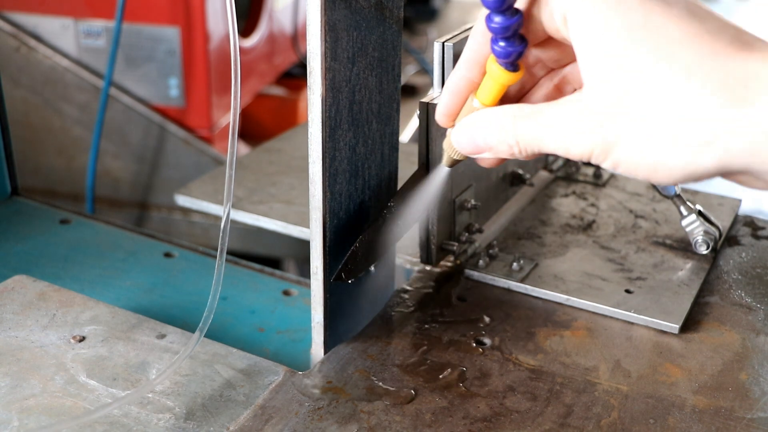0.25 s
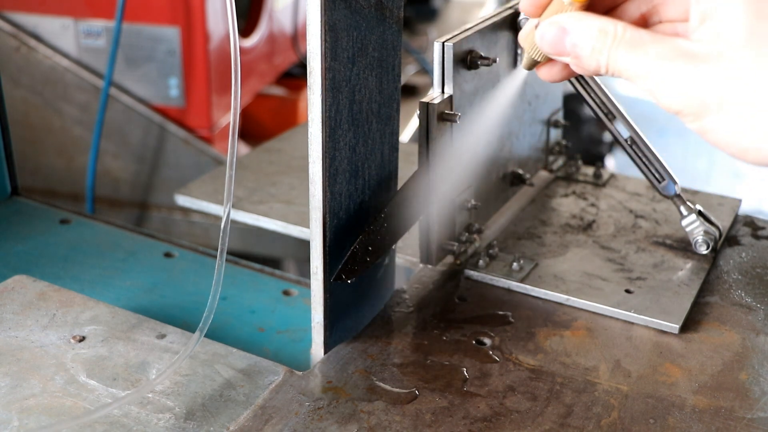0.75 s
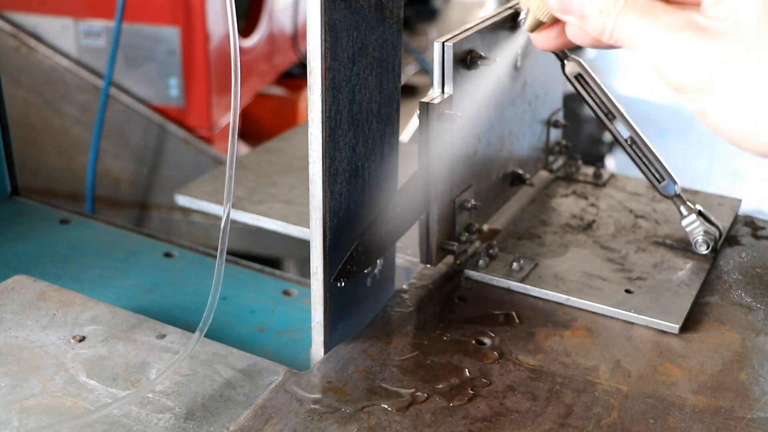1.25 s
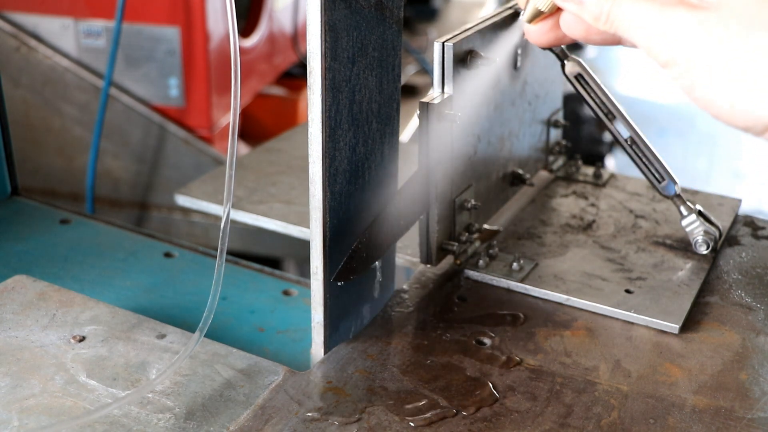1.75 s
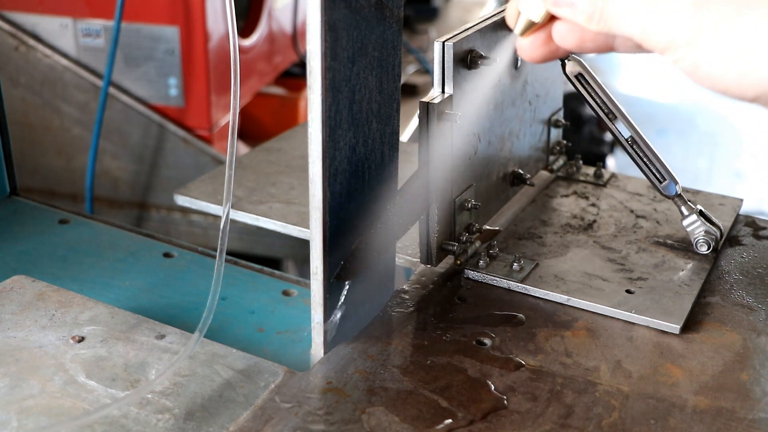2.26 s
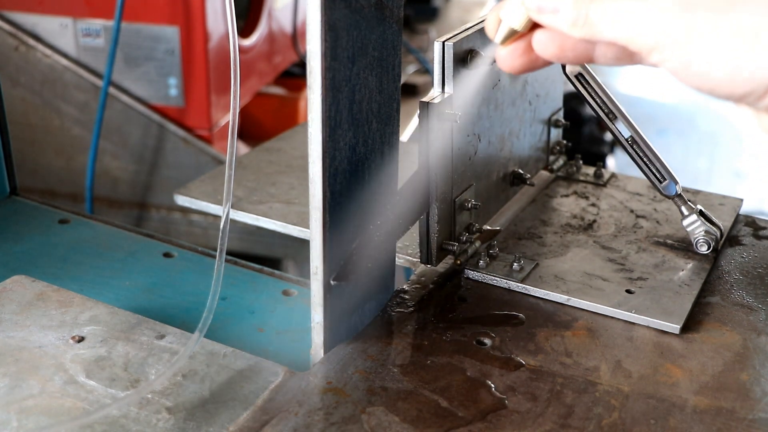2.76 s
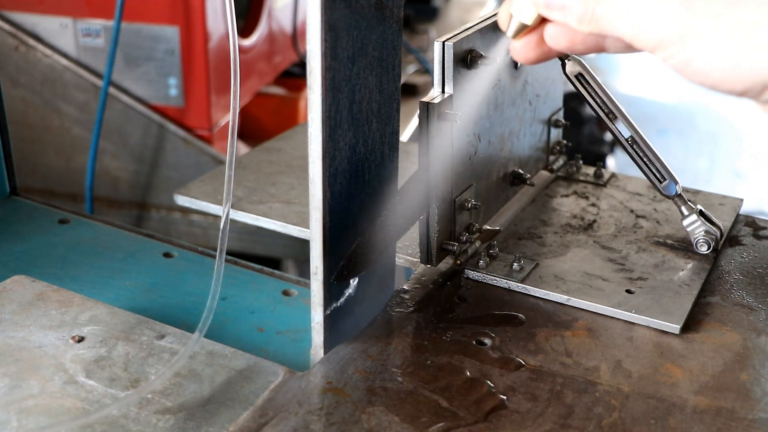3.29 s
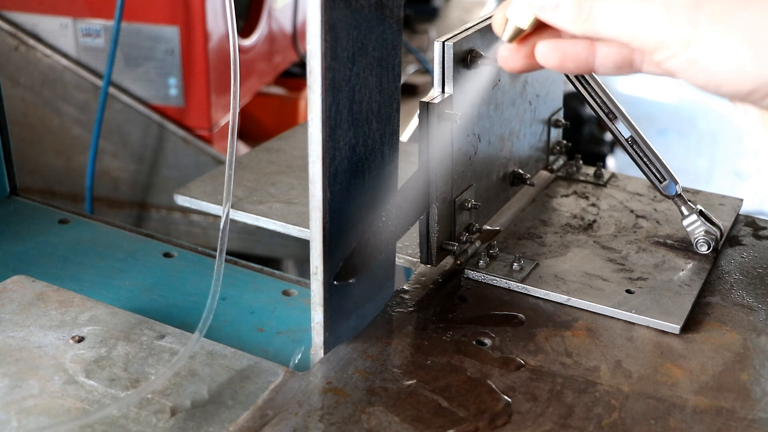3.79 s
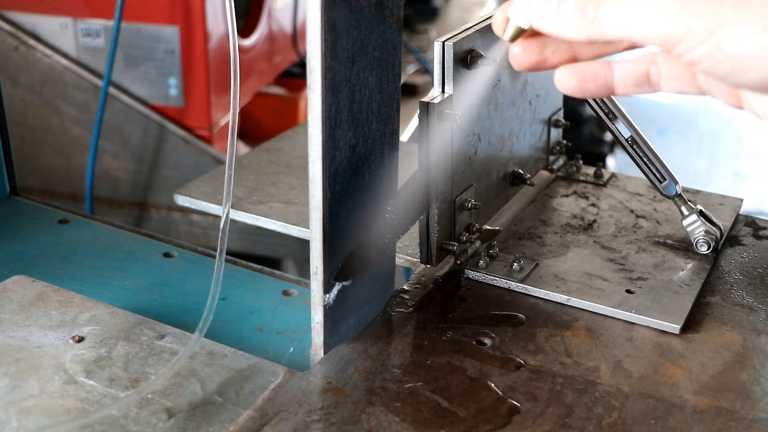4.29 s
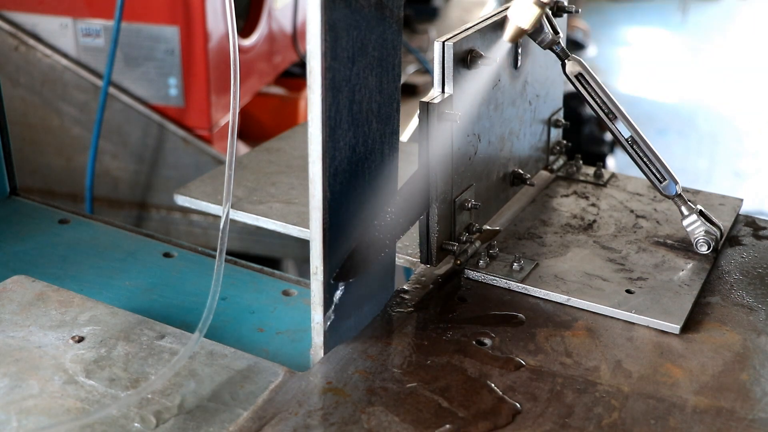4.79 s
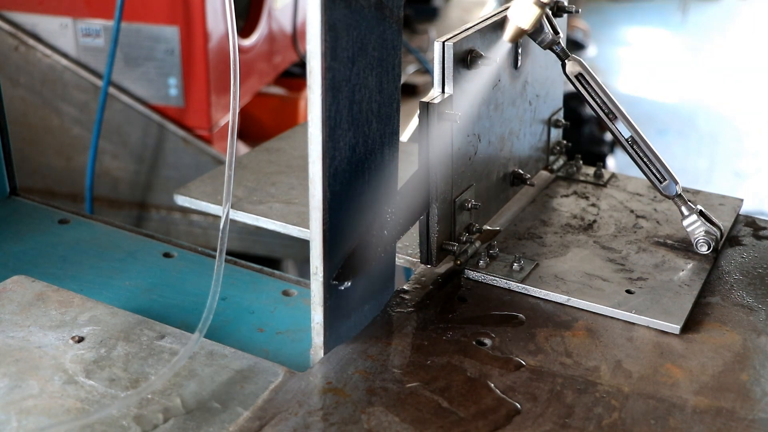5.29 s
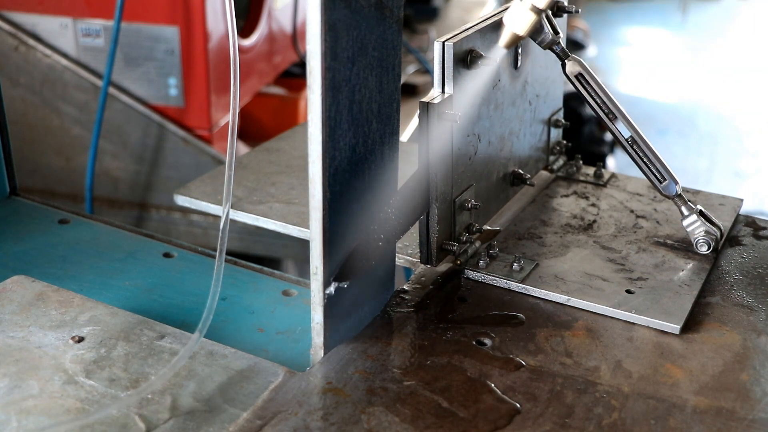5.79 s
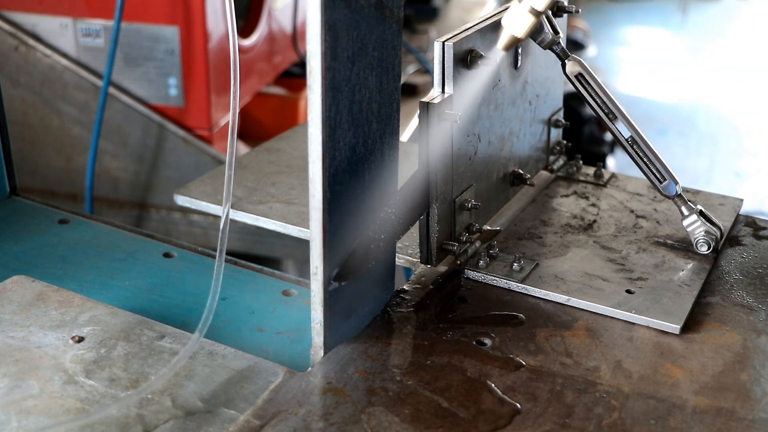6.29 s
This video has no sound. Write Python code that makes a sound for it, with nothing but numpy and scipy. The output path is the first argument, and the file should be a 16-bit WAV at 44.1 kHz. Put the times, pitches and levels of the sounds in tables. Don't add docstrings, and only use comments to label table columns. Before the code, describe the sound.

A compressed-air nozzle blows fine mist on a steel blade throughout, close to a stereo microphone in a workshop with short, bright reflections. From 0 to about 1.2 seconds the jet is near: dense sizzling hiss, a coarse midrange roar and irregular buffeting slaps, strongest at the start and around 0.3 to 0.6, with a bright flick near 0.9 followed by a duller push. As the nozzle rises, the hiss takes on a sliding, hollow, phasing color. From 1.2 to 4.1 it is steadier and smoother, slightly stronger near 1.7, softer around 2.15, with a tiny tick at 2.6, leaning a little right. Around 4.4 the hand leaves and the hiss briefly dips and changes color. It then steadies, with somewhat firmer roar and buffeting, a clearer low hum, and light slaps near 5.8 and 6.5, still blowing at the end.

```python
import sys
import numpy as np
from scipy import signal
from scipy.io import wavfile
from scipy.ndimage import uniform_filter1d

SR = 44100
rng = np.random.default_rng(int(sys.argv[2]) if len(sys.argv) > 2 else 0)


def undo_db(level):
    steps = np.asarray(level, float) / 20
    return 10 ** steps


def generate_wav(signal):
    frames = np.transpose(np.atleast_2d(signal))
    scaled = np.clip(frames, -1, 1) * 32767
    pcm = np.round(scaled).astype(np.int16)
    wavfile.write(sys.argv[1], SR, pcm)


N = 288803
HOP, SIZE, LOW_SIZE = 128, 512, 2048
TIME = np.arange(N // HOP + 6) * HOP / SR
HZ = np.fft.rfftfreq(SIZE, 1 / SR)[:, None]
LOW_HZ = np.fft.rfftfreq(LOW_SIZE, 1 / SR)[:, None]

# (time [s], nozzle hiss [dB], left-right [dB], force on the blade [dB])
JET = [(0.0, -23.5, -1.5, -34), (0.4, -23.5, -2.5, -34.5), (0.7, -23, -3, -37), (1.2, -23, -3, -41.5),
       (1.65, -22, -3, -42.5), (2.15, -25, -5.0, -42.5), (2.65, -23.5, -3.5, -40.5), (3.35, -24, -4, -40.5),
       (3.65, -24, -4, -41), (4.12, -22.5, -3.5, -41), (4.38, -26.5, -3.5, -40.5), (4.58, -24.5, -3, -38.5),
       (4.9, -23.5, -2.5, -38), (5.35, -23.2, -2.9, -37.5), (5.65, -23, -1.9, -38), (6.55, -24, -2.5, -37)]
# (time [s], detour by the bench [ms], detour by the plate [ms], turn to the post [0-1])
POSE = [(0.0, .376, .73, 0), (.3, .377, .697, 0), (.5, .436, .766, -.1), (.6, .515, .8, 0),
        (.7, .549, .872, 0), (.95, .581, .965, .15), (1.2, .644, .99, 0), (1.55, .645, 1.042, .12),
        (1.9, .634, 1.02, .3), (2.15, .619, .88, 0), (2.5, .599, .876, .2), (2.9, .593, .874, .4),
        (3.3, .582, .869, .4), (3.7, .578, .862, .85), (4.15, .577, .9, 1), (4.6, .582, .875, .35),
        (5.4, .581, .87, .35), (6.0, .584, .738, .35)]
BENCH_REST_MS, PLATE_REST_MS = .585, .88
EASY_DB = -40.5
BUFFET_DB = -50
LET_GO_S = 4.4


def evened(x):
    return x / np.sqrt(np.mean(abs(x) ** 2) + 1e-20)


def read(points, hz):
    f, value = np.transpose(points)
    return np.interp(np.log(hz + 1), np.log(f + 1), value)


def columns(rows, t):
    s, *values = np.transpose(rows)
    return [np.interp(t, s, v) for v in values]


def smoothed(x, length, axis=-1):
    return uniform_filter1d(uniform_filter1d(x, length, axis=axis), length, axis=axis)


def drift(frames):
    return evened(smoothed(rng.standard_normal(len(TIME)), frames))


def unsteady(frames, bins):
    field = rng.standard_normal((len(TIME), len(HZ))).T
    return evened(smoothed(smoothed(field, bins, axis=0), frames, axis=1))


def eddies(bins, frames):
    a, b = rng.standard_normal((frames, bins, 2)).T
    return a + 1j * b


def sound(z, size):
    return signal.istft(z, nperseg=size, noverlap=size * 3 // 4)[1][..., :N]


def pair(colour):
    # (frequency [Hz], likeness [0-1])
    likeness = [(30, 1), (230, .9995), (310, .965), (640, .88), (1400, .7)]
    frames = N * 4 // LOW_SIZE + 6
    same = np.clip(read(likeness, LOW_HZ), -1, 1)
    left = eddies(len(LOW_HZ), frames)
    right = same * left + np.sqrt(1 - same ** 2) * eddies(len(LOW_HZ), frames)
    return evened(sound(np.array([left, right]) * colour, LOW_SIZE))


def rumble():
    # (frequency [Hz], density [dB])
    hum = [(13, -52), (22, -17), (108, -9.5), (171, -1.5), (200, -3), (220, -7), (290, -57), (480, -120)]
    t = np.arange(N) / SR
    open_db = 2.5 * np.clip((t - LET_GO_S) / .3, 0, 1)
    force_db = columns(JET, t)[2] - EASY_DB
    level_db = -62 + open_db + 0.6 * force_db
    return pair(undo_db(read(hum, LOW_HZ))) * undo_db(level_db)


def shop(x):
    # (frequency [Hz], t60 [s])
    decay = [(300, 0.057), (2000, 0.46), (8000, 0.27), (16000, 0.025)]
    start_s, spacing = .0012, 20
    slots = np.arange(0, SR // 2 - spacing, spacing)
    at = slots + rng.integers(0, spacing, (2, len(slots)))
    taps = np.zeros((2, SR // 2))
    np.put_along_axis(taps, at, rng.choice([-1., 1.], at.shape), axis=1)
    hz, t, z = signal.stft(taps, SR, nperseg=256)
    tail = signal.istft(z * undo_db(-60 * t / read(decay, hz)[:, None]), SR, nperseg=256)[1]
    tail = np.pad(tail, ((0, 0), (round(start_s * SR), 0)))
    return signal.fftconvolve(x[None], tail / np.linalg.norm(tail[0]), axes=1)[:, :N]


def slapped(t):
    # (start [s], hold [s], level above the buffeting [dB], brightness [dB])
    slaps = [
        (0.0, 0.17, 5, 3),
        (0.154, .025, 1, 4),
        (.325, 0.082, 5.5, 6),
        (0.454, 0.027, 4, -8),
        (.55, 0.098, 2, 0),
        (.855, 0.027, 3.5, 9),
        (0.928, .25, 5, -21),
        (2.598, 0.0091, 2, -1),
        (5.83, 0.036, 3.5, 3),
        (6.5, .05, 1.5, 1),
    ]
    rise_s, fall_s = 0.011, .06
    force_db = columns(JET, t)[2] - EASY_DB
    level_db = BUFFET_DB + 1.5 * force_db
    upper_db = -7 + 1.26 * force_db
    for start, hold, lift_db, bright_db in slaps:
        rise = 1 + (t - start) / rise_s
        fall = 1 + (start + hold - t) / fall_s
        shape = np.clip(np.minimum(rise, fall), 0, 1)
        level_db = level_db + lift_db * shape
        upper_db = upper_db + bright_db * shape
    return level_db, upper_db


def buffeting():
    # (frequency [Hz], density [dB])
    thump = [(88, -45), (150, -17.5), (247, -3.5), (306, -5.5), (438, -3.5), (565, -8), (770, -10.5),
             (840, -11.5), (1000, -14), (1300, -10), (2200, -120)]
    # (frequency [Hz], width [Hz], lift [dB])
    room_modes = [(261, 26, 7), (360, 35, 3), (443, 32, 6), (500, 20, 4), (659, 24, 7), (850, 60, 4)]
    trim_db, bright, right_db, body_per_db = .3, .8, .4, 0.14
    lift_db = sum(db / (1 + (2 * (LOW_HZ - mode_hz) / width) ** 2) for mode_hz, width, db in room_modes)
    level_db, upper_db = slapped(np.arange(N) / SR)
    slap = pair(undo_db(read(thump, LOW_HZ) + lift_db))
    low = signal.sosfiltfilt(signal.butter(3, 770, fs=SR, output="sos"), slap)
    body = signal.sosfiltfilt(signal.butter(2, (330, 540), "bandpass", fs=SR, output="sos"), slap)
    upper = (slap - low) * undo_db(bright * upper_db)
    gathered = body * (undo_db(body_per_db * (level_db - BUFFET_DB)) - 1)
    return (low + upper + gathered) * undo_db(level_db + trim_db) * undo_db([[-right_db], [right_db]])


def echo(rule):
    bench_ms, plate_ms, turn = columns(POSE, TIME)
    lift, swing = bench_ms - BENCH_REST_MS, plate_ms - PLATE_REST_MS
    path = []
    for ms, per_lift, per_swing, strength, swing_gain, turn_gain in rule:
        path.append(ms + per_lift * lift + per_swing * swing)
        path.append(np.maximum(strength + swing_gain * swing + turn_gain * turn, 0))
    return path


def unsettled(path):
    pass_s, pass_half_s, blocked = 4.39, 0.18, 0.65
    tremor_ms, wander_db = .004, 1.
    clear = 1 - blocked * np.clip(2 - 2 * abs(TIME - pass_s) / pass_half_s, 0, 1)
    shake_ms = tremor_ms * drift(40) * np.where(TIME < LET_GO_S, 1, .3)
    left, right = clear * undo_db(wander_db * np.array([drift(90), drift(90)]))
    return [path[0] + shake_ms, path[1] * left, path[2] + shake_ms, path[3] * right]


def near_echoes(hiss):
    # (delay at rest [ms], shift per bench detour [ms/ms],
    # shift per plate detour [ms/ms], strength [gain], more per plate detour [gain/ms], more per turn [gain])
    bench = [(.585, 1, 0, .09, .03, .04), (.591, 1, 0, .135, .12, .09)]
    plate = [(.855, 0, 0, .03, 0, .08), (.88, 0, 1, .07, -.05, .05)]
    post = [(.465, -.12, 0, .09, -.05, .02), (.488, .05, 0, .11, 0, .28)]
    ledge = [(.3, 0, 0, .06, 0, 0), (.3, 0, 0, .06, 0, .03)]
    # (time [s], delay left [ms], strength left [gain], delay right [ms], strength right [gain])
    hand = [(0.0, .307, .09, .297, .12), (.45, .335, .03, .295, .11), (.9, .31, .13, .295, .11),
            (1.4, .324, .14, .292, .05), (2.3, .318, .04, .276, .14), (3.2, .344, .04, .265, .13),
            (4.1, .351, .04, .263, .12), (4.45, .354, .05, .265, .02), (6.55, .355, .05, .3, .05)]
    # (time [s], delay left [ms], strength left [gain],
    # delay right [ms], strength right [gain])
    frame = [(0.0, .948, .04, .95, .03), (.5, .95, .07, .95, .04), (.8, .914, 0, .912, 0),
             (1.4, .88, .12, .873, .14), (1.9, .886, .09, .868, .12), (2.5, .855, .05, .845, .07),
             (4.1, .855, .05, .828, .11), (4.8, .853, 0, .853, .09), (6.55, .875, .04, .868, .065)]
    mirrors = [(3.6, 2.9), (2.0, 1.4), (.8, 2.3), (.3, 1.3), (2.4, 0), (1.0, 0)]
    # (time [s], lag [ms])
    left_lag = [(0, 0.018), (.3, 0.022), (.5, 0.032), (1.1, 0.039), (2.7, 0.03), (4.2, 0.033),
                (6.55, 0.025)]
    short = np.clip((HZ - 5500) / 2000, 0, 1)
    caught = np.clip((HZ - 900) / 1400, 0, 1)
    paths = echo(bench), columns(hand, TIME), echo(plate), echo(post), columns(frame, TIME), echo(ledge)
    ears = np.ones((2, len(HZ), len(TIME)), complex)
    for path, (long_gain, short_gain) in zip(map(unsettled, paths), mirrors):
        gain = caught * (long_gain + short * (short_gain - long_gain))
        for ear in range(2):
            delay_ms, strength = path[2 * ear:2 * ear + 2]
            ears[ear] += gain * strength * np.exp(-2j * np.pi * HZ * delay_ms / 1000)
    ears /= np.sqrt(np.sum(abs(ears * hiss) ** 2, axis=1, keepdims=True) / np.sum(hiss ** 2, axis=0))
    ears[0] *= np.exp(-2j * np.pi * HZ * columns(left_lag, TIME)[0] / 1000)
    return ears


def jet_hiss(level_db, pan_db):
    # (frequency [Hz], density [dB])
    fizz = [(1470, -25), (2500, -19), (3420, -23.5), (5810, -10), (6770, -6.5), (7480, -3), (8320, -2),
            (9480, -1.5), (10200, -3.5), (12300, -4), (15600, -13.5)]
    spit_db, trim_db = 0.57, 1.3
    plate_ms, turn = columns(POSE, TIME)[1:]
    top_db = pan_db - 2.5 * turn
    top_share = np.clip((HZ - 10500) / 3000, 0, 1)
    hiss_db = read(fizz, HZ) + top_share * (top_db - top_db.mean()) + spit_db * unsteady(11, 234)
    hiss_db += -12.5 * (plate_ms - PLATE_REST_MS) * np.exp(-((HZ - 6670) / 2000) ** 2)
    return evened(undo_db(hiss_db)) * undo_db(level_db + trim_db)


def blade_roar(blade_db):
    # (frequency [Hz], density [dB])
    growl = [(180, -90), (350, -55), (600, -16), (1200, -4), (1580, -5.5), (1930, -5.5), (2580, -8.5),
             (3030, -5.0), (4000, -1.5), (5200, -5.5), (8800, -120)]
    roar = evened(undo_db(read(growl, HZ))) * undo_db(blade_db - 2.0)
    deep = np.clip((1600 - HZ) / 700, 0, 1)
    return roar * undo_db(0.7 * (blade_db - blade_db.mean()) * deep)


def nozzle():
    # (frequency [Hz], level [dB])
    room_share = [(500, -17), (1200, -4.5), (2500, -2), (5000, -2), (8500, -4), (12000, -2.5), (15000, .5)]
    # (frequency [Hz], share of the left-right level [dB/dB])
    shadow = [(300, -2.9), (1000, 0.5), (2500, 2), (5000, 1), (15000, 1.9)]
    patchy_db, room_combed, room_pan = 0.19, .5, .72
    other = .72
    level_db, pan_db, blade_db = columns(JET, TIME)
    hiss = jet_hiss(level_db, pan_db)
    colour = np.hypot(hiss, blade_roar(blade_db)) * undo_db(patchy_db * unsteady(30, 8))
    ears = near_echoes(hiss)
    side_db = np.clip(read(shadow, HZ), 0, 2) * pan_db / 2
    jet = eddies(len(HZ), len(TIME))
    near = sound(jet * colour * ears * undo_db([side_db, -side_db]), SIZE)
    walls = colour * undo_db(read(room_share, HZ))
    scattered = np.array([eddies(len(HZ), len(TIME)) for ear in range(2)])
    scattered = scattered * abs(ears) ** room_combed
    far = np.sqrt(1 - other) * shop(sound(jet * walls, SIZE))
    far = far + np.sqrt(other) * sound(scattered * walls, SIZE)
    far_side_db = room_pan * np.interp(np.arange(N) / SR, TIME, pan_db) / 2
    both = near + far * undo_db([far_side_db, -far_side_db])
    return both / np.sqrt(np.mean(sound(jet, SIZE) ** 2))


def scene():
    thin = signal.butter(4, 260, "highpass", fs=SR, output="sos")
    return rumble() + buffeting() + signal.sosfilt(thin, nozzle())


def top_cut(x):
    return signal.sosfilt(signal.butter(12, 16810, fs=SR, output="sos"), x)


def record(dry):
    edge = signal.firwin(1023, 15760, window=("kaiser", 10), fs=SR)
    return top_cut(signal.oaconvolve(dry, edge[None], "same"))


dry = scene()
out = record(dry)
generate_wav(out)
```